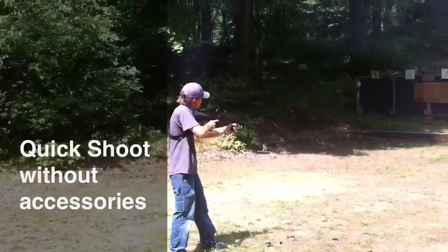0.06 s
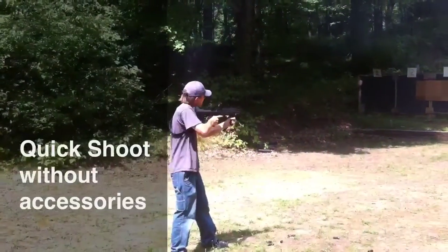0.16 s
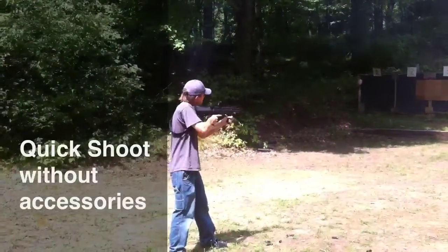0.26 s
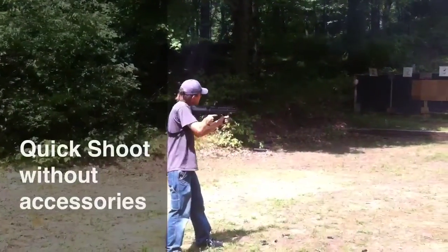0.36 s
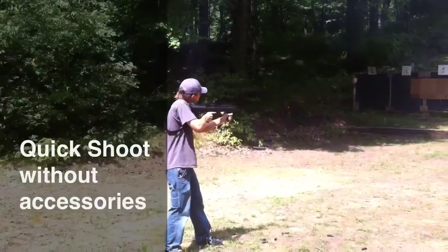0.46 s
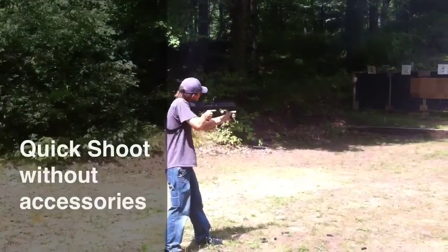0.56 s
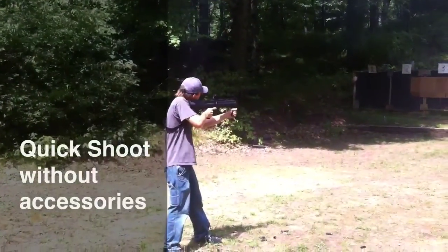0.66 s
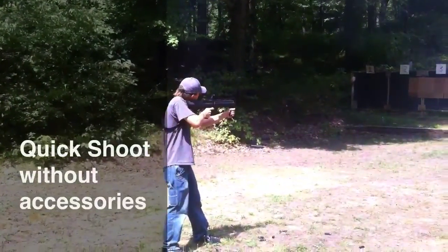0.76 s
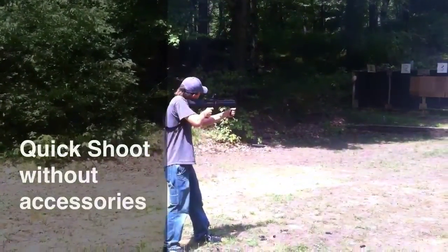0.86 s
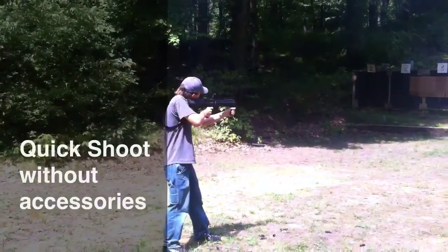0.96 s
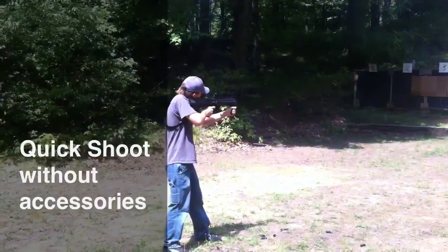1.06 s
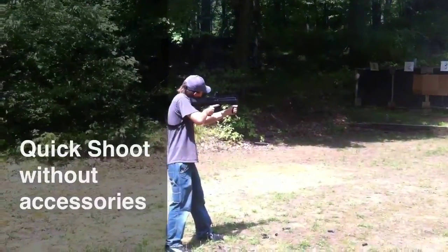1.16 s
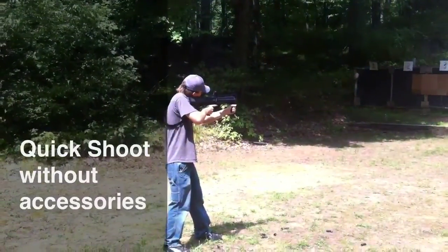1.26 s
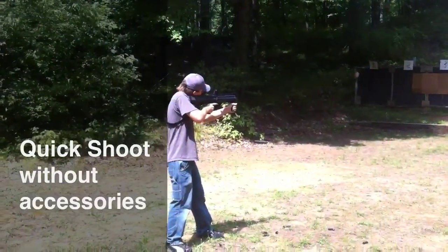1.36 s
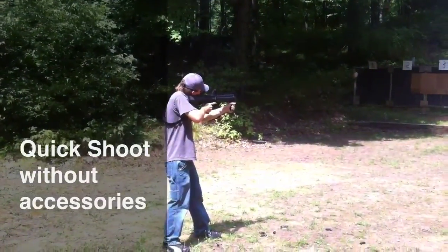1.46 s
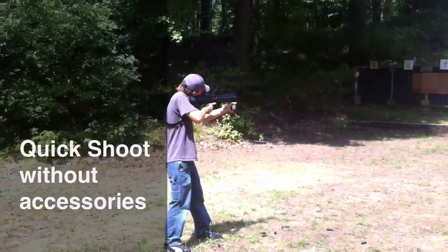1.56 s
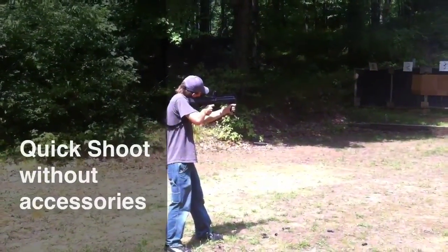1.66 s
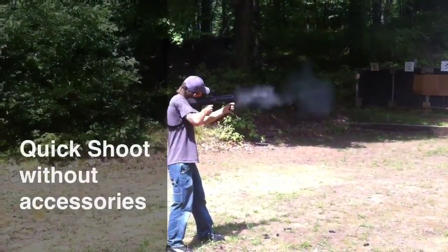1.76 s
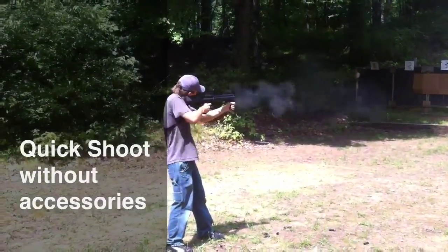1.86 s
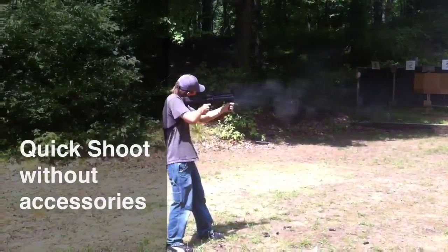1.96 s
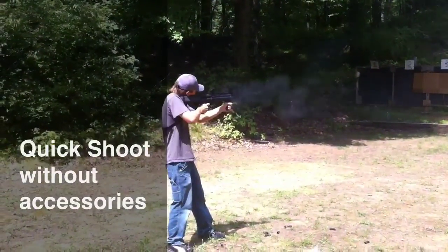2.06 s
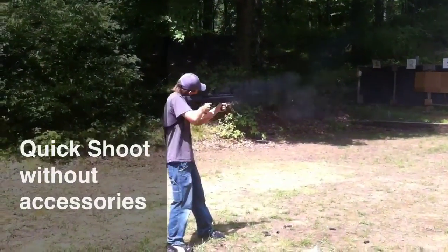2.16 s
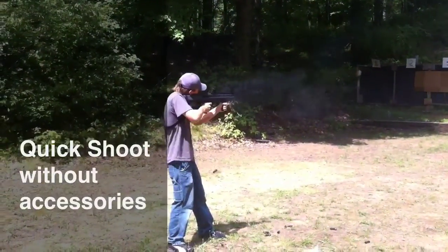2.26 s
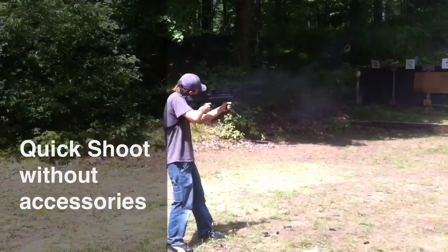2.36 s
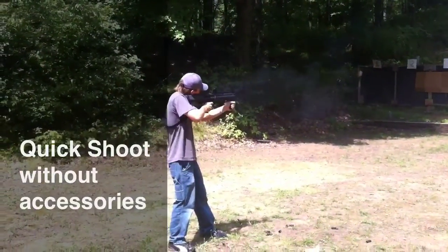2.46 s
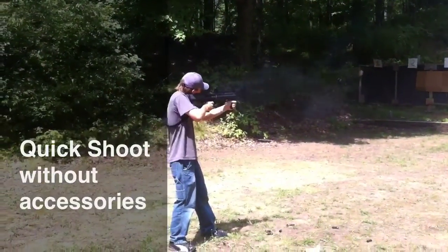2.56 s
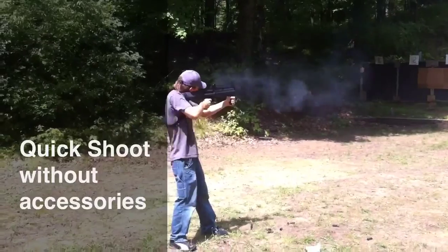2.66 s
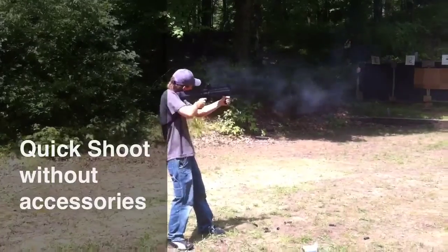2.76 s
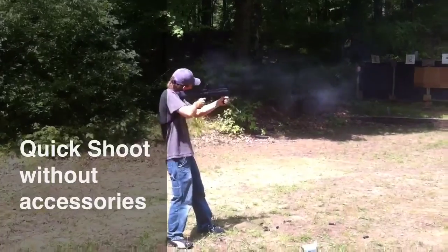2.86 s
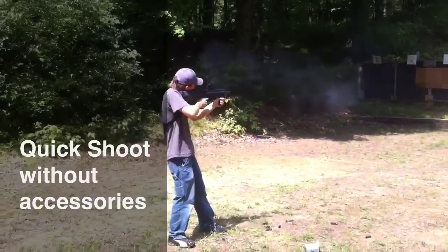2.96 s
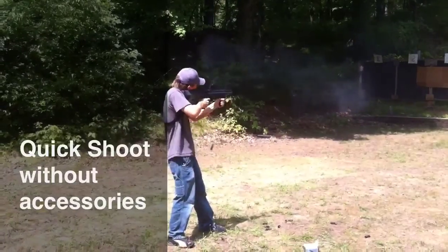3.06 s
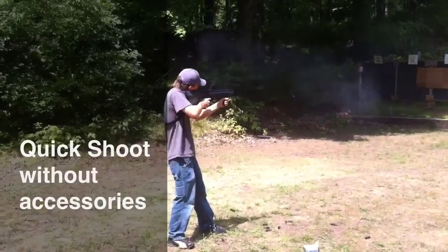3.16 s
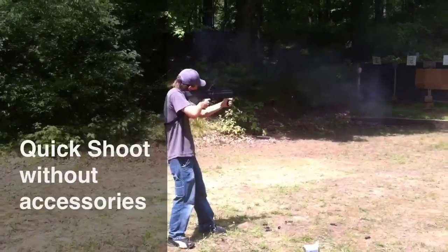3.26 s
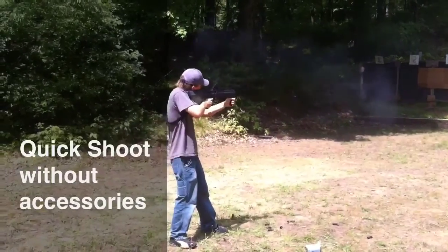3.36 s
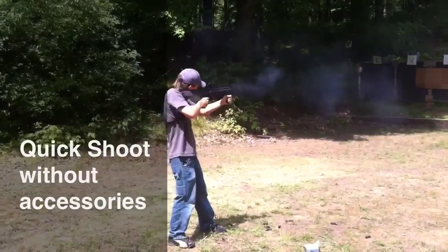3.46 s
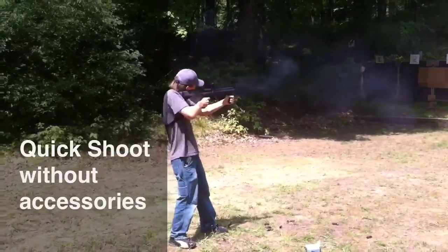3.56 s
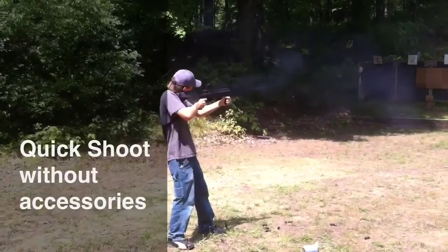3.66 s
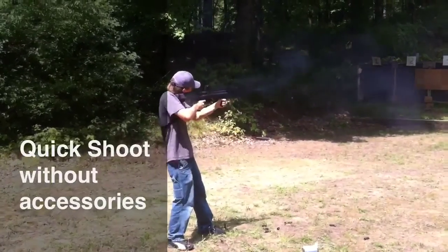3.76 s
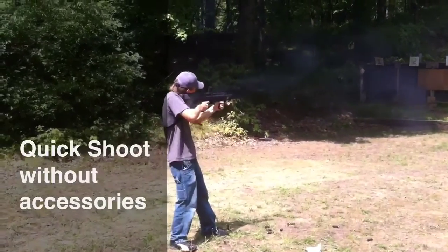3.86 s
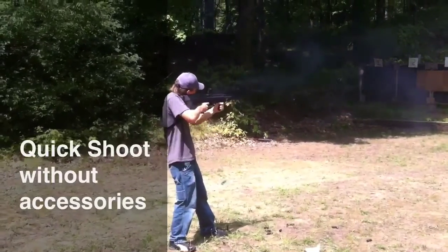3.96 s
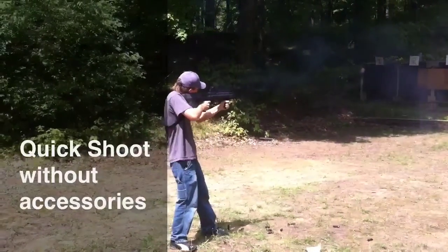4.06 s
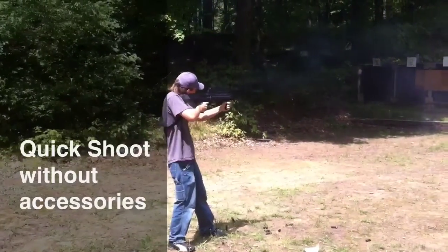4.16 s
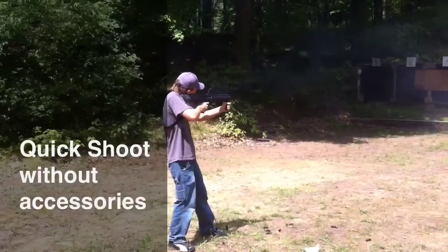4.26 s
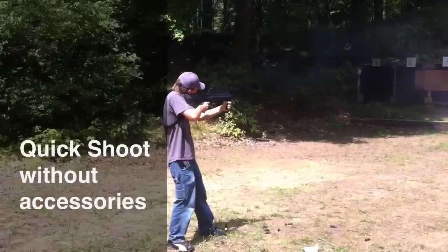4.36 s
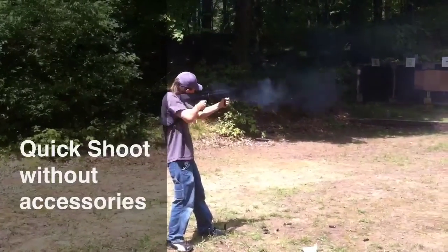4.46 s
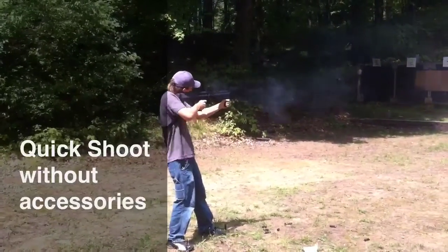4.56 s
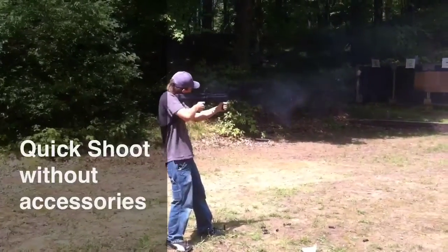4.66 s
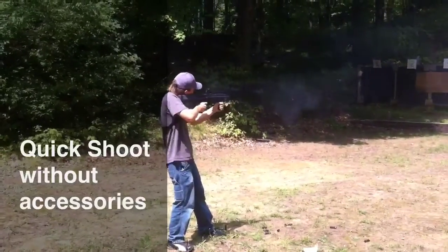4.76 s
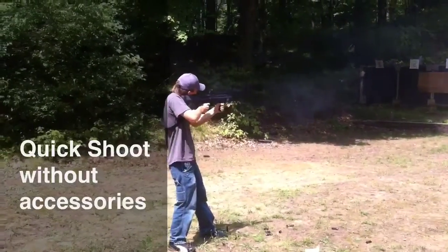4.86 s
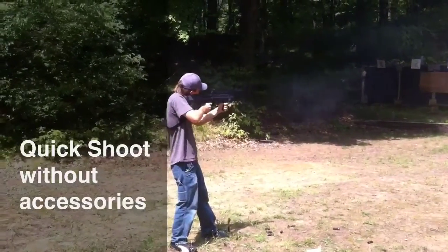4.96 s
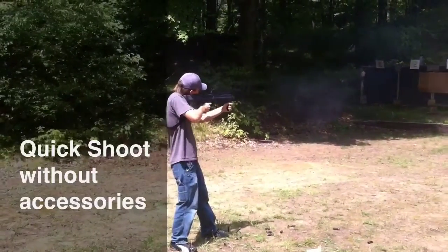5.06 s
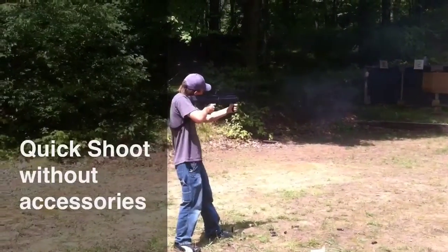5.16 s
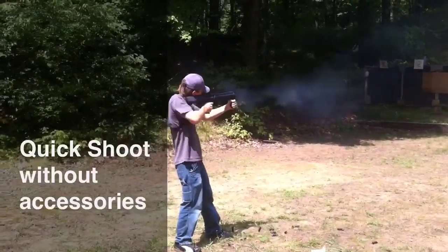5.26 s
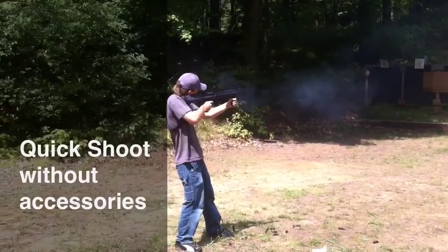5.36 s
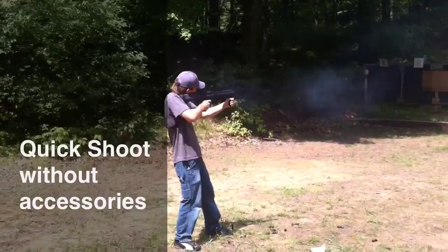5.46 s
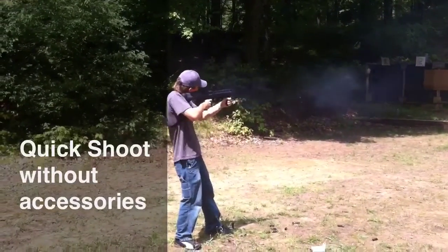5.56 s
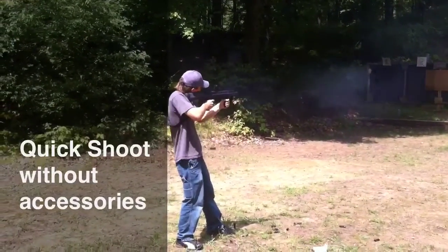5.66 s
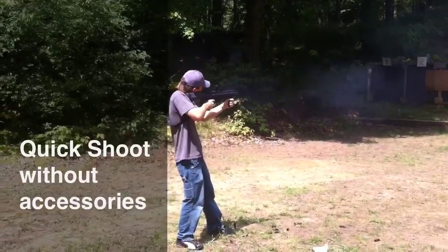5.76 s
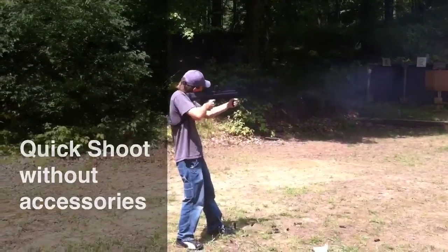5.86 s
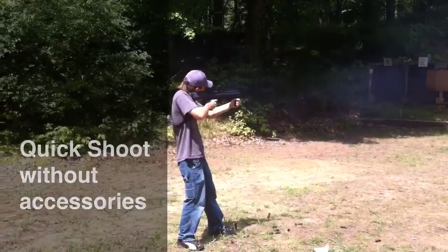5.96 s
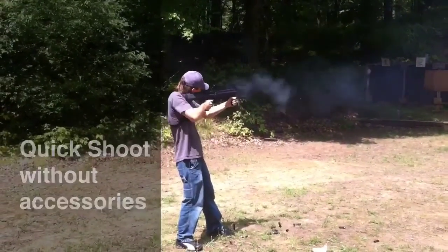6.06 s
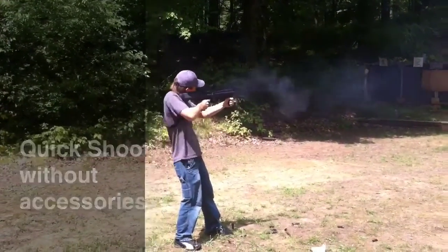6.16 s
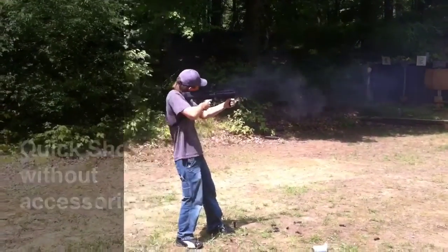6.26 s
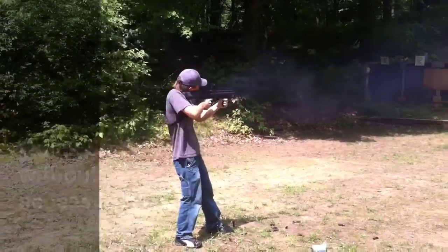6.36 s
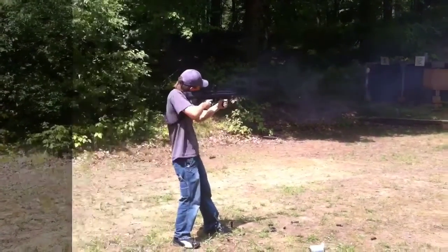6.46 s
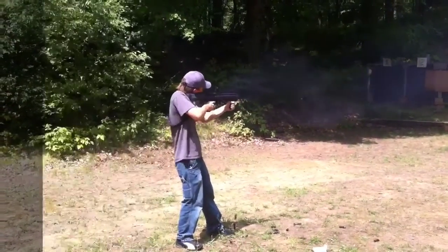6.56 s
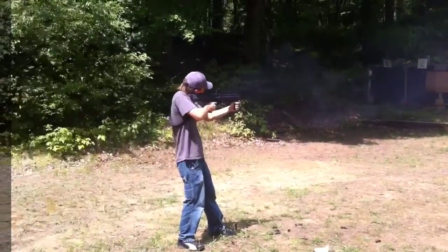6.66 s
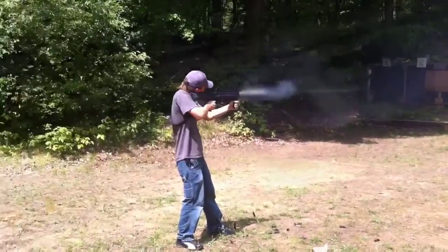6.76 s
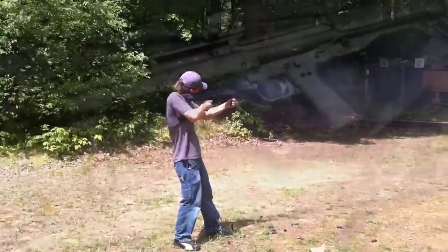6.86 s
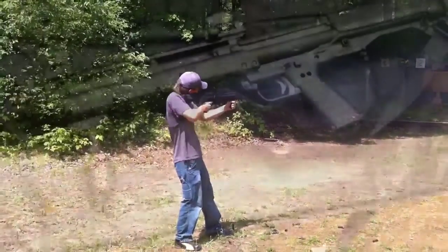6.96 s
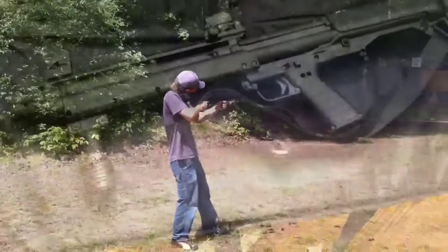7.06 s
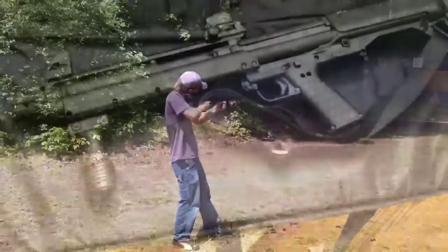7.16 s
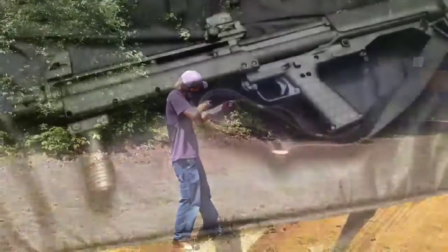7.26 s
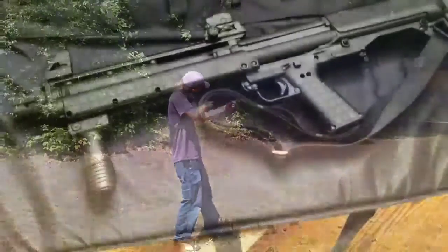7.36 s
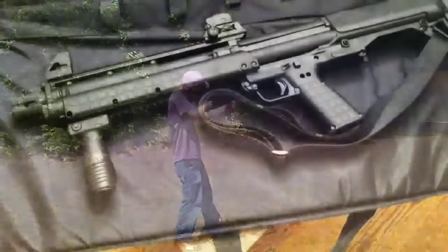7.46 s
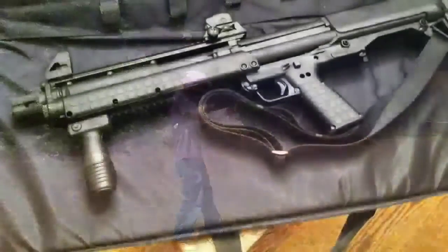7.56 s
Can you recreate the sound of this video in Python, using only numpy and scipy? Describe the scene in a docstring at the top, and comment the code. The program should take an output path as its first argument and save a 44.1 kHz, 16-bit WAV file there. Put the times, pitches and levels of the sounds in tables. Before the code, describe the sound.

A pump shotgun is racked and fired seven times outdoors, each harsh crack rolling away through the trees.

```python
"""A pump shotgun fires seven times in a forest clearing, overloading a small camera's microphone.
Each muzzle blast is a pressure push with a harsh crack. It slaps back off two range walls, thuds off
the ground and an earth bank, then rolls away through the trees. The action is racked before the first
shot and after each one: steel parts click, slide and slam. Faint air lies under it; the end fades out."""
import sys
import numpy as np
from scipy import signal
from scipy.fft import rfft, irfft
from scipy.io import wavfile
from scipy.ndimage import uniform_filter1d

SR = 44100
rng = np.random.default_rng(int(sys.argv[2]) if len(sys.argv) > 2 else 0)


def materialize(psi):
    """Save the field psi as 16-bit PCM at rate SR to the path in sys.argv[1].

    A 1-D psi becomes a single channel; in a 2-D psi each row is a channel.
    """
    bounded = np.clip(np.atleast_2d(psi).T, -1, 1)
    quanta = np.round(bounded * 32767).astype(np.int16)
    wavfile.write(sys.argv[1], SR, quanta)


N = 335468
TIME_S = np.arange(N) / SR

# spectra: freq_hz, density_db
AIR_SPECTRUM = [(35, -27), (60, -22), (167, -5), (385, -7), (475, -7.5), (599, -9.5), (1480, -12),
                (3420, -13.5), (6410, -16), (15500, -24)]
WOODS_SPECTRUM = [(40, -36), (80, -36.5), (150, -26.5), (300, -15.5), (700, -13), (1020, -4), (1300, -7),
                  (1580, -4), (1880, 0), (2300, -4.5), (4000, -5.5), (6000, -5), (8300, -12),
                  (10500, -18.5), (16000, -26)]
STEEL_SPECTRUM = [(150, -47.5), (550, -31), (900, -14.5), (1700, -6), (2270, -9), (3100, -6.5),
                  (3900, -13.5), (5000, -1.5), (6000, 2), (6800, -2.5), (8300, -14), (12100, -13.5),
                  (13600, -13), (16000, -19)]
FORE_END_SPECTRUM = [(300, -30), (900, -10), (1400, -1), (2500, -4), (3800, -13), (16000, -35)]
NEAR_WALL_SPECTRUM = [(100, -47.5), (300, -26.5), (700, 1), (2200, -1), (4000, -3.5), (8000, -9.5),
                      (12000, -17), (16000, -17.5)]
FAR_WALL_SPECTRUM = [(60, -5.5), (240, -10.5), (420, -24), (700, -16.5), (1100, -1), (1480, -7), (2200, 3),
                     (4300, -6), (5200, -7.5), (6500, -15.5), (8000, -4.5), (11000, -20), (16000, -20.5)]
STING_SPECTRUM = [(100, -49.5), (4200, -30.5), (5300, 1), (5800, -1.5), (6800, -6), (8200, -26.5),
                  (16000, -48.5)]
CRACK_SPECTRUM = [(100, -19.5), (250, -15), (650, -7), (850, -12), (1100, -6), (1450, 4), (1750, 2.5),
                  (2050, 2.5), (3100, -3.5), (4500, -4.5), (7500, -5.5), (9000, -15), (11500, -16.5),
                  (13000, -11), (16000, -19)]

# forest decay: freq_hz, t60_s
FOREST_DECAY = [(80, 0.5), (200, 0.51), (450, 2.15), (1000, 1.82), (1900, 1.685), (3200, 1.294),
                (6000, 0.99), (9000, 0.81), (14000, 0.52)]
# receiver and bolt resonances: centre_hz, width_hz, lift_db
RECEIVER_MODES = [(1930, 91, 7), (2722, 140, 5.5), (4760, 87, 2.5), (5960, 270, 3), (6750, 75, 4),
                  (13600, 600, 5)]
# fore-end pulled back: rear_stop_s, level_db, travel_s, eject_delay_s, shell_db
PUMP_PULLS = [(.322, -26, 0.052, .063, -28), (2.297, -40, .063, .057, -37), (3.122, -41, .067, .061, -35.5),
              (3.969, -41, .064, 0.056, -36.5), (4.93, -39.5, 0.073, 0.052, -35.5),
              (5.747, -38, .055, .050, -39.5), (6.512, -41.5, 0.064, 0.046, -46),
              (7.238, -42.5, .06, .056, -49)]
# fore-end pushed home: bolt_meets_barrel_s, level_db, feed_lead_s
PUMP_PUSHES = [(.641, -27, 0.026), (2.559, -42, 0.0096), (3.372, -33.5, .022), (4.293, -40, 0.012),
               (5.226, -36, 0.0048), (5.963, -35.5, .026), (6.747, -35.5, 0.023), (7.426, -30, .011)]
# loose parts in handling: start_s, level_db
HANDLING_TICKS = [(.262, -40), (.2845, -35), (0.2956, -40), (0.4245, -38.5), (.537, -39), (.7217, -44.5),
                  (4.442, -43)]
# fore-end at the start of a slow push: start_s, level_db
FORE_END_KNOCKS = [(.537, -39.5), (.572, -47)]
# pitch of the far wall's evenly spaced boards: pitch_hz, level_db, t60_s
BOARD_TONES = [(1138, -16.5, 0.02), (1907, -11, 0.012), (2115, -14, 0.019), (2415, -15, 0.024),
               (3250, -11.5, 0.013), (4220, -11.5, 0.018)]
# returns from ground and earth bank: delay_s, pitch_hz, level_db, life_s
GROUND_THUDS = [(.003, 166.3, -37, 0.0026), (0.076, 245, -34, 0.0019), (0.102, 255, -36, 0.0027)]
# camera case rung by the blast: pitch_hz, level_db, t60_s
CASE_MODES = [(1505, -3.5, 0.019), (2032, -0.5, 0.02)]
# muzzle blasts: start_s, crack_db, sting_db, push_db, case_re_crack_db, echo_db
MUZZLE_BLASTS = [(1.8900, -8, -6, -2, -2, 1.5), (2.7262, -5.5, -7, -0.5, 4, 2.5),
                 (3.5607, -6.5, -10, -13, 3, 2), (4.5545, -6, -8, -6, -1.5, 1.5),
                 (5.3526, -4.5, -12.5, 3, 1.5, 1.24), (6.1573, -7.5, -5, -6.5, -2.5, 1.64),
                 (6.9206, -7, -9.5, -3.5, 1, 0.4)]


def amp(db):
    """Decibels to gain."""
    return 10 ** (np.asarray(db) / 20)


def unit(x):
    """Scale to rms 1."""
    return x / np.sqrt(np.mean(x ** 2) + 1e-20)


def along(points, hz):
    """Interpolate on a log frequency axis."""
    freq_hz, values = np.transpose(points)
    return np.interp(np.log(hz + 1), np.log(freq_hz + 1), values)


def noise(spectrum, size):
    """Coloured noise, rms 1."""
    gain = amp(along(spectrum, np.fft.rfftfreq(size, 1 / SR)))
    return unit(irfft(rfft(rng.standard_normal(size)) * gain, size))


def snap(spectrum, size=2048):
    """Minimum-phase pulse, peak 1."""
    cepstrum = irfft(np.log(amp(along(spectrum, np.fft.rfftfreq(size, 1 / SR)))))
    cepstrum[1:size // 2] *= 2
    cepstrum[size // 2 + 1:] = 0
    pulse = irfft(np.exp(rfft(cepstrum)))
    return pulse / np.abs(pulse).max()


def ring(modes, rise_s=0.00022, detune=0.009):
    """Damped tones, slightly detuned each time."""
    t = TIME_S[:SR // 16]
    tones = sum(amp(db - 60 * t / t60_s) * np.sin(2 * np.pi * (hz * rng.normal(1, detune) * t + rng.random()))
                for hz, db, t60_s in modes)
    return tones * (1 - np.exp(-t / rise_s))


def add(track, start_s, sound):
    """Mix a sound into a track."""
    part = track[max(round(start_s * SR), 0):][:len(sound)]
    part += sound[:len(part)]


def air(level_db=-61, drop_db=-3):
    """Outdoor hush, lower from the first shot on."""
    firing = TIME_S > MUZZLE_BLASTS[0][0]
    return amp(level_db + drop_db * firing) * noise(AIR_SPECTRUM, N)


def thicket(patchy_db=1.5):
    """Scatter from trunks; clumps of trees return brief stronger patches."""
    bands = signal.stft(noise(WOODS_SPECTRUM, 2 * SR), nperseg=256)[2]
    clumps = uniform_filter1d(rng.standard_normal(bands.shape), size=8, axis=0)
    clumps = uniform_filter1d(clumps, size=3, axis=1)
    return unit(signal.istft(bands * amp(patchy_db * unit(clumps)), nperseg=256)[1][:2 * SR])


def forest(scatter, swell_s, decay_ref_s, bass_lag=1.2, bass_hz=700):
    """Scatter swells as the wave enters the trees; bass comes late, treble dies first."""
    hz, t, bands = signal.stft(scatter, SR, nperseg=512)
    decay = amp(-60 * (t - decay_ref_s) / along(FOREST_DECAY, hz)[:, None])
    rise_s = swell_s * (1 + bass_lag / (1 + (hz[:, None] / bass_hz) ** 2))
    onset = 1 - np.exp(-(t / rise_s) ** 2)
    return signal.istft(bands * decay * onset, SR, nperseg=512)[1][:2 * SR]


def wall(spectrum, facets, bounce_s, bounce_db, scatter_db, scatter_s, variation=0.34):
    """Slap, ground bounce and facet scatter, much the same on every shot."""
    t = TIME_S[:len(facets)]
    scatter = (facets + variation * rng.standard_normal(len(t))) * t / scatter_s * np.exp(-t / scatter_s)
    path = amp(scatter_db) * scatter / np.linalg.norm(scatter)
    path[0] += 1
    path[round(bounce_s * rng.normal(1, .04) * SR)] += amp(bounce_db)
    return signal.fftconvolve(path, snap(spectrum))


def thud(pitch_hz, life_s):
    """Low pulse thrown back by earth."""
    t = TIME_S[:SR // 8]
    return t / life_s * np.exp(1 - t / life_s) * np.sin(2 * np.pi * pitch_hz * rng.normal(1, 0.079) * t)


def steel(size, lift_spread=0.21):
    """Noise in the action's metal, rms 1; each contact favours other resonances."""
    hz = np.fft.rfftfreq(size, 1 / SR)
    lift_db = sum(db * rng.normal(1, lift_spread) / (1 + (2 * (hz - centre_hz) / width_hz) ** 2)
                  for centre_hz, width_hz, db in RECEIVER_MODES)
    return unit(irfft(rfft(noise(STEEL_SPECTRUM, size)) * amp(lift_db), size))


def knock(rise_s=0.0022, fall_s=0.0086):
    """Dull contact of the fore-end."""
    t = TIME_S[:SR // 16]
    return (1 - np.exp(-t / rise_s)) * np.exp(-t / fall_s) * noise(FORE_END_SPECTRUM, len(t))


def click(rise_s=0.00078, fall_s=.0028, rattle_db=-23, rattle_s=0.01):
    """Sharp steel contact with a little loose rattle."""
    t = TIME_S[:SR // 6]
    decay = np.exp(-t / fall_s) + amp(rattle_db) * np.exp(-t / rattle_s)
    return (1 - np.exp(-t / rise_s)) * decay * steel(len(t))


def slam(hold_s, rise_s=0.0018, fall_s=0.0054):
    """The slide chatters against a stop until the hands damp it."""
    t = TIME_S[:SR // 6]
    return (1 - np.exp(-t / rise_s)) * np.exp(-np.maximum(t - hold_s, 0) / fall_s) * steel(len(t))


def scrape(middle_s, half_s):
    """Envelope of a slide that speeds up, then slows."""
    return np.exp(-((TIME_S - middle_s) / half_s) ** 2)


def pump_action(feed_db=-41.5, grit_db=4, woods_db=-19):
    """Unlock, rear stop, shell out, next shell in, bolt home and locked; the trees answer faintly."""
    out, sliding = np.zeros((2, N))
    for stop_s, db, travel_s, eject_delay_s, shell_db in PUMP_PULLS:
        add(out, stop_s - travel_s, amp(db - 3.5) * click())  # unlock
        add(out, stop_s, amp(db) * slam(hold_s=.012))
        add(out, stop_s + eject_delay_s, amp(shell_db) * click())
        sliding += amp(db - 20) * scrape(stop_s - travel_s / 2, .28 * travel_s)
        sliding += amp(shell_db - 16) * scrape(stop_s + eject_delay_s + .015, .015)  # shell leaves port
    for home_s, db, feed_lead_s in PUMP_PUSHES:
        add(out, home_s - feed_lead_s, amp(feed_db) * click())  # lifter spring snaps a shell up
        add(out, home_s, amp(db + 2.5) * click())
        add(out, home_s + .0065, amp(db) * slam(hold_s=.0045))  # lock
        sliding += amp(db - 27) * scrape(home_s - .07, .07)  # bolt
        sliding += amp(db - 23) * scrape(home_s - feed_lead_s / 2, feed_lead_s / 2)  # shell
    for start_s, db in HANDLING_TICKS:
        add(out, start_s, amp(db) * click())
    for start_s, db in FORE_END_KNOCKS:
        add(out, start_s, amp(db) * knock())
    stick_slip = amp(grit_db * unit(uniform_filter1d(rng.standard_normal(N), size=200)))
    out += sliding * unit(stick_slip * steel(N))
    trees = forest(rng.standard_normal(2 * SR), swell_s=0.026, decay_ref_s=0)
    trees *= np.exp(-TIME_S[:2 * SR] / .1)
    return out + amp(woods_db) * signal.fftconvolve(out, trees / np.linalg.norm(trees))[:N]


def precursor(level_db=-23, rise_s=.003):
    """Air driven from the barrel ahead of the load."""
    t = TIME_S[:SR // 200]
    return amp(level_db) * np.exp(-((t - t[-1]) / rise_s) ** 2) * noise(CRACK_SPECTRUM, len(t))


def blast(crack_db, sting_db, push_db, case_db,
          hold_s=0.0021, fall_s=0.0026, spray_db=-21, spray_s=0.013, push_s=0.00055):
    """Pressure push and suction under a crack, a thin sting ringing in the microphone's port, ground spray and
    the case's ring."""
    t = TIME_S[:SR // 8]
    envelope = np.exp(-np.maximum(t - hold_s, 0) / fall_s) + amp(spray_db) * np.exp(-t / spray_s)
    rms = np.sqrt(np.mean(envelope ** 2))
    crack = rms * unit(envelope * noise(CRACK_SPECTRUM, len(t)))
    sting = rms * unit(envelope * noise(STING_SPECTRUM, len(t)))
    add(crack, 0, amp(case_db) * ring(CASE_MODES))
    push = amp(4) * (1 - t / push_s) * np.exp(-t / push_s)
    return amp(crack_db) * crack + amp(sting_db) * sting + amp(push_db) * push


def gunfire(near_delay_s=.0617, far_delay_s=.07, woods_db=-34.5):
    """Each shot: puff, blast, two wall slaps, low thuds, long roll of the woods."""
    out = np.zeros(N)
    near_facets, far_facets = rng.standard_normal((2, SR // 32))
    trunks = thicket()
    for start_s, crack_db, sting_db, push_db, case_db, echo_db in MUZZLE_BLASTS:
        puff = precursor()
        add(out, start_s - len(puff) / SR, puff)
        add(out, start_s, blast(crack_db, sting_db, push_db, case_db))
        near_slap = wall(NEAR_WALL_SPECTRUM, near_facets,
                         bounce_s=0.00051, bounce_db=-26, scatter_db=-5, scatter_s=0.00097)
        far_slap = wall(FAR_WALL_SPECTRUM, far_facets,
                        bounce_s=0.001103, bounce_db=2, scatter_db=1.5, scatter_s=0.002)
        add(out, start_s + near_delay_s, amp(echo_db - 2) * near_slap)
        add(out, start_s + far_delay_s, amp(echo_db - 2.5) * far_slap)
        add(out, start_s + far_delay_s, amp(echo_db) * ring(BOARD_TONES))
        for delay_s, pitch_hz, db, life_s in GROUND_THUDS:
            add(out, start_s + delay_s, amp(db + echo_db) * thud(pitch_hz, life_s))
        scatter = unit(trunks + .75 * thicket())  # same trees, blurred by moving air and leaves
        add(out, start_s, amp(woods_db + echo_db) * forest(scatter, swell_s=0.031, decay_ref_s=.14))
    return out


def scene():
    """Gun and clearing, mono."""
    return (gunfire() + pump_action() + air())[None]


def record(dry, ceiling=0.69, low_cut_hz=130, top_hz=15800, fade_start_s=6.856, fade_end_s=7.78):
    """Microphone saturation and bass cut, then closing fade and band limit."""
    saturated = dry / (1 + (dry / ceiling) ** 4) ** (1 / 4)
    thin = signal.sosfilt(signal.butter(2, low_cut_hz, 'high', fs=SR, output='sos'), saturated)
    faded = thin * np.clip((fade_end_s - TIME_S) / (fade_end_s - fade_start_s), 0, 1)
    return signal.sosfilt(signal.ellip(10, .1, 80, top_hz, fs=SR, output='sos'), faded)


dry = scene()
out = record(dry)
materialize(out)
```